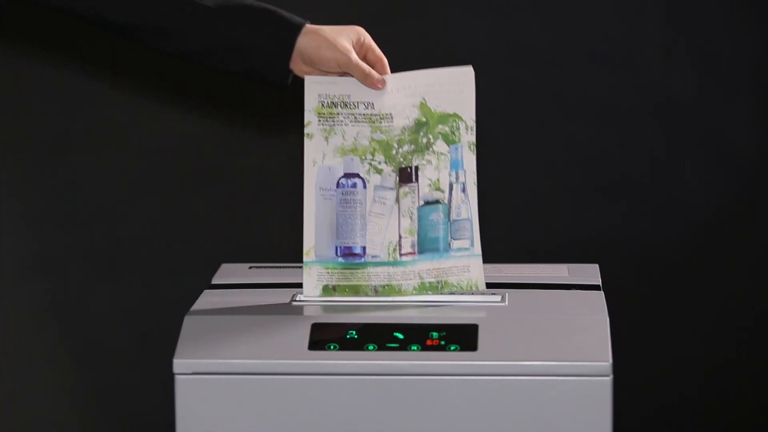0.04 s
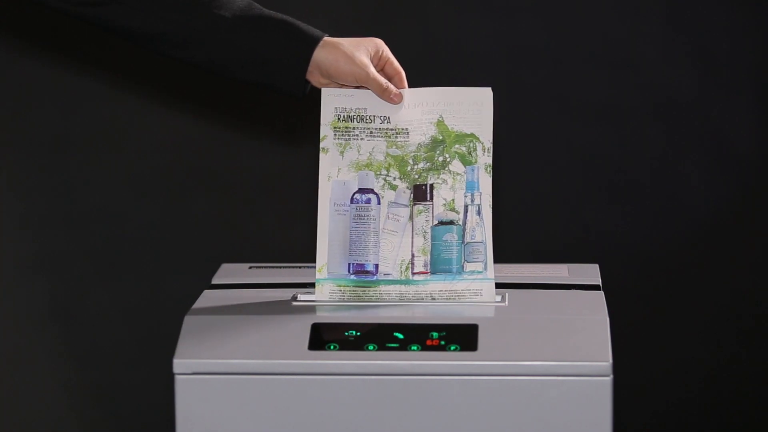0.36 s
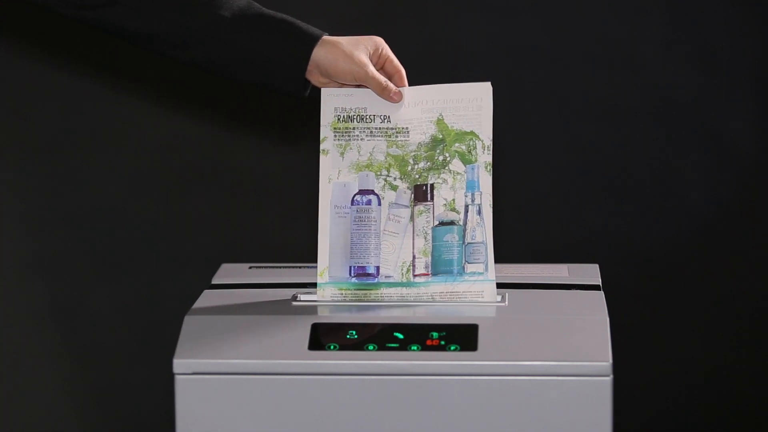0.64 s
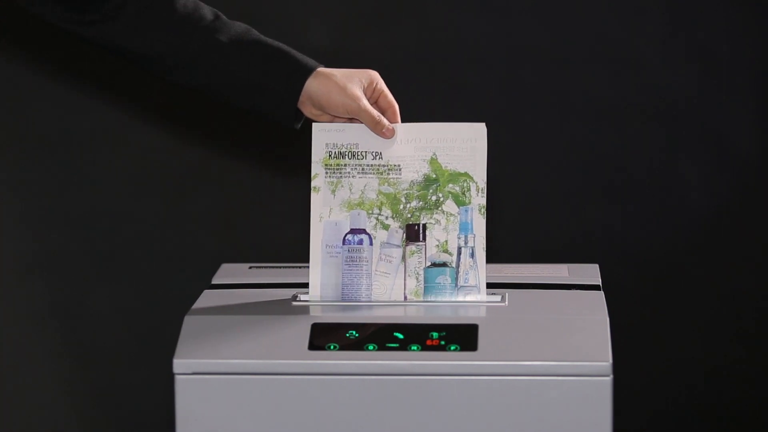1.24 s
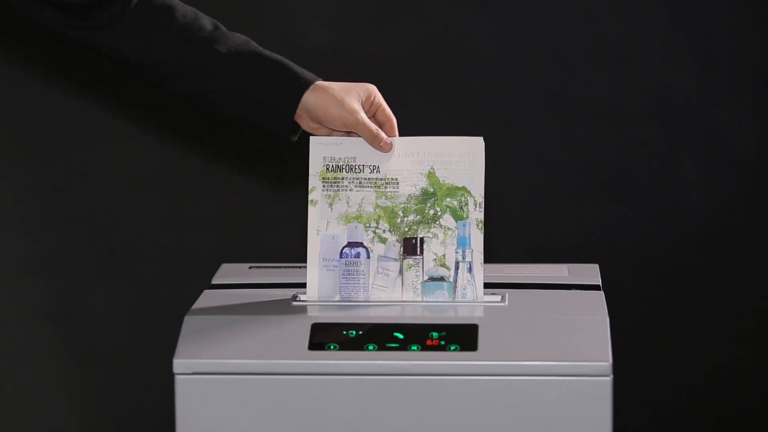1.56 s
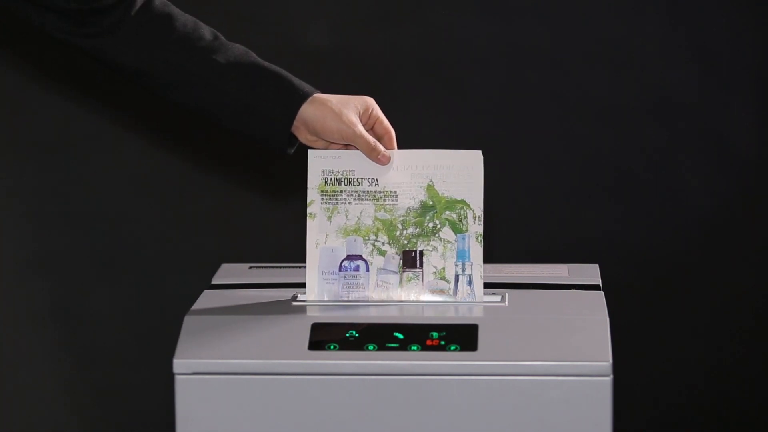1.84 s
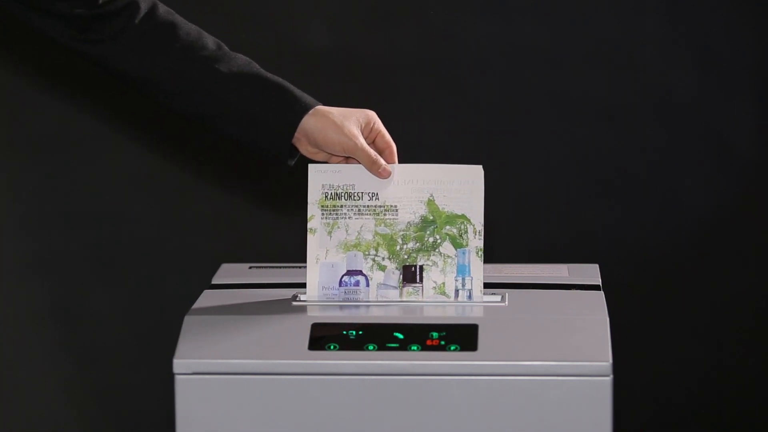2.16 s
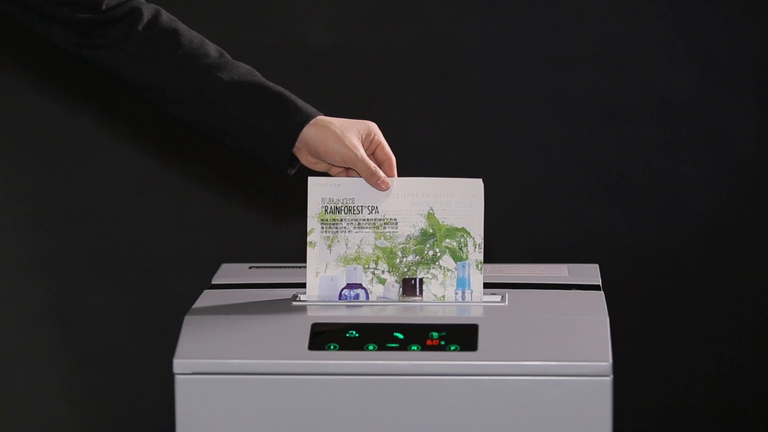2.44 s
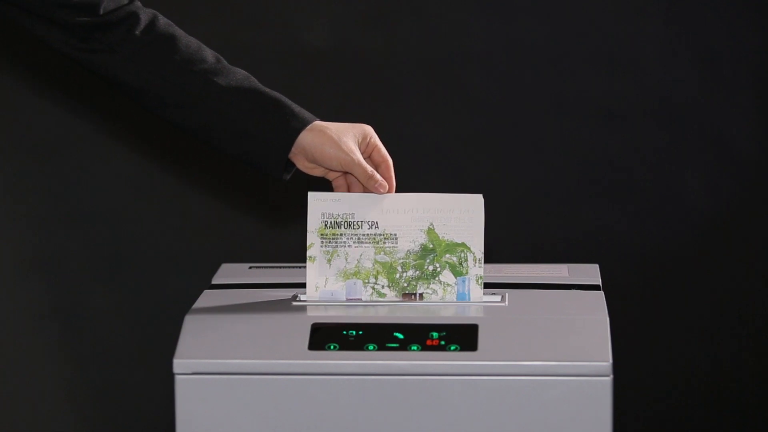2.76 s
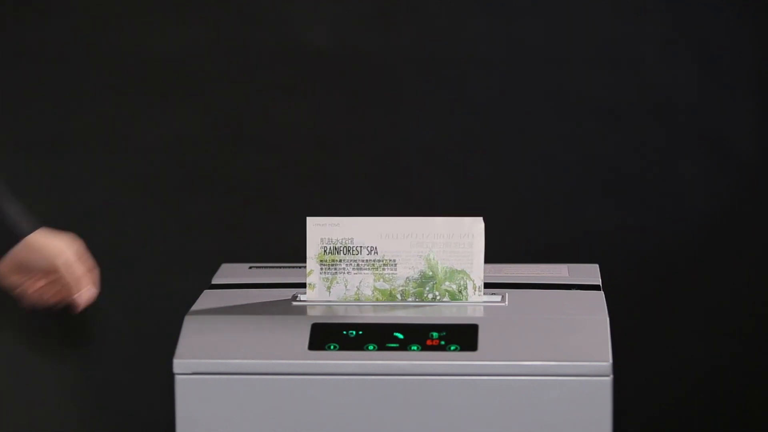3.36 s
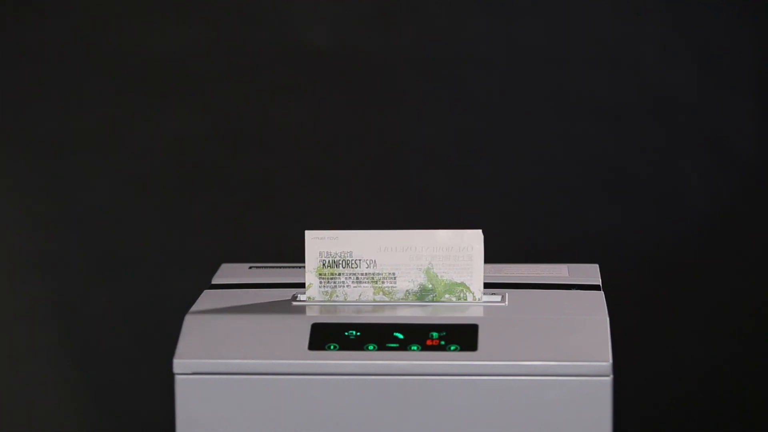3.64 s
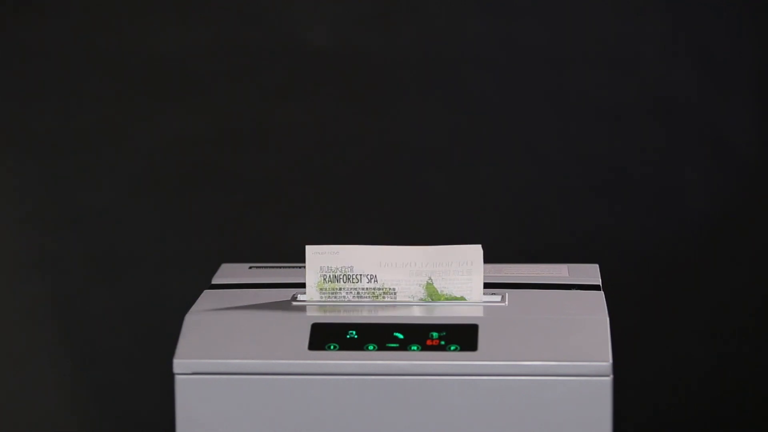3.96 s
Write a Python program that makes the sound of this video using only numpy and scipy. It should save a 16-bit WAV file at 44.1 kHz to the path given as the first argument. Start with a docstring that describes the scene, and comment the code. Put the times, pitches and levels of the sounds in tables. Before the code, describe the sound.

An office shredder grabs paper with a few sharp cracks and crunches. The cutting softens, then builds to a continuous sizzle, while the motor whines and the gears whir throughout in a dry indoor space.

```python
"""An office shredder cuts a few sheets of glossy paper, in a dry room.
The paper crunches and snaps as the cutters catch it; its breaking fibres then thicken to a steady
sizzle, with a short echo from cabinet and bin. The cutting loads the induction motor, which whines
and throbs once a turn over a whirring gear train."""
import sys
import numpy as np
from scipy import signal
from scipy.fft import rfft, irfft
from scipy.io import wavfile

SR = 44100
rng = np.random.default_rng(int(sys.argv[2]) if len(sys.argv) > 2 else 0)


def dump(signal):
    """Clip the signal to [-1, 1] and save it as 16-bit WAV at the path in sys.argv[1]."""
    limited = np.clip(np.atleast_2d(signal).T, -1, 1)
    pcm = np.round(limited * 32767).astype(np.int16)
    wavfile.write(sys.argv[1], SR, pcm)


N = 176400
T = np.arange(N) / SR
MAINS_HZ, WHINE_PER_TURN = 50, 30.13

# paper sizzle spectrum: f/Hz, relative density/dB
SIZZLE_SPECTRUM = [(1500, -20), (4000, -6), (5500, -4), (8200, 0), (11500, -2.5), (13500, -6.5),
                   (14700, -9.5), (15800, -15)]
# paper crunch spectrum: f/Hz, relative density/dB
CRUNCH_SPECTRUM = [(80, -25), (300, -5), (900, 1.5), (1600, 3.5), (3000, 0.5), (4400, -6), (5800, -16.5),
                   (9000, -15.5), (15000, -35)]


def amp(db):
    """Decibels to gain."""
    return 10 ** (np.asarray(db) / 20)


def unit(x):
    """Scales to rms 1."""
    return x / np.sqrt(np.mean(x ** 2) + 1e-20)


def curve(rows, column=1):
    """Table column interpolated over time."""
    rows = np.array(rows)
    return np.interp(T, rows[:, 0], rows[:, column])


def colour(x, spectrum):
    """Filters x by a spectrum; rms 1."""
    hz, db = np.transpose(spectrum)
    f_hz = np.fft.rfftfreq(N, 1 / SR)
    gain = amp(np.interp(np.log(f_hz + 1), np.log(hz), db))
    return unit(irfft(rfft(x) * gain, N))


def drift(rate_hz):
    """Slow random motion; rms 1."""
    f_hz = np.fft.rfftfreq(N, 1 / SR)
    lowpass = (f_hz > 0) / (1 + (f_hz / rate_hz) ** 4)
    return unit(irfft(rfft(rng.standard_normal(N)) * lowpass, N))


def by_load(load, free, full):
    """Blends from the free-running to the full-load value."""
    return free + (full - free) * load


def cabinet_rumble(level_db=-55, decay_s=.11):
    """Soft cabinet rumble, dying away at the start."""
    # f/Hz, relative density/dB
    spectrum = [(60, -10), (180, -4), (280, -7), (480, 3), (700, -8), (1500, -20), (5000, -45)]
    return amp(level_db) * np.exp(-T / decay_s) * colour(rng.standard_normal(N), spectrum)


def gear_mesh(turns, teeth_per_turn=4.871, backlash_cycles=.0076, waver=.15):
    """Tones of meshing teeth, loosened by backlash."""
    # harmonics of the tooth rate
    orders = [2, 3, 4, 8, 9, 10, 13]
    # per harmonic: level/dB
    levels_db = [-85.5, -80.5, -78, -67.5, -74.5, -74.5, -77.5]
    mesh_cycles = teeth_per_turn * turns + backlash_cycles * drift(4.2)
    out = np.zeros(N)
    for order, db in zip(orders, levels_db):
        gain = amp(db) * (1 + waver * drift(14))
        out += gain * np.cos(2 * np.pi * (order * mesh_cycles + rng.random()))
    return np.sqrt(2) * out


def gear_whir(turns, load, rub_db=-56, throb_depth=.0415, load_rise_db=7.5):
    """Gears and bearings rub, pulsing with the shaft and ringing the housing."""
    # f/Hz, relative density/dB
    rub_spectrum = [(20, -5), (72, -1), (150, -11.5), (260, -10), (450, -7), (570, -3.5), (690, 3.5),
                    (780, 0.5), (890, -5.5), (1130, -3), (1550, -1), (1950, -5), (2500, -4), (3400, -6),
                    (4100, -13), (5300, -16.5), (8200, -13.5), (12000, -21.5), (14000, -19), (15800, -29)]
    # f/Hz, bandwidth/Hz, level at half load/dB
    housing_modes = [(583.5, 12, -74), (674, 34, -71.5), (1197, 45, -72.5), (1335, 44, -82),
                     (1585, 50, -71.5), (1730, 69, -80.5), (2230, 110, -70), (2500, 44, -71.5),
                     (2640, 50, -76.5), (3097, 32, -67.5), (3228, 31, -71.5), (3530, 43, -73.5),
                     (4350, 44, -76), (6220, 130, -77), (8380, 150, -78.5), (11340, 200, -80)]
    throb = 1 + throb_depth * np.cos(2 * np.pi * turns)
    out = amp(rub_db) * colour(throb * rng.standard_normal(N), rub_spectrum)
    for hz, width_hz, db in housing_modes:
        b, a = signal.iirpeak(hz, hz / width_hz, SR)
        ring = unit(signal.lfilter(b, a, throb * rng.standard_normal(N)))
        out += amp(db + load_rise_db * (load - .5)) * ring
    return out


def motor_side_tones(turns, load, waver=.28):
    """Unsteady sidebands and octave of the whine, plus mains hum."""
    # f as a sum of multiples of: whine, shaft rate, mains
    multiples = [(1, 2, 0), (1, -2, 0), (1, -3, 0), (1, 0, -4), (1, 0, 12), (2, 0, 0), (0, 0, 4), (0, 0, 6),
                 (0, 0, 12)]
    # per tone: free level/dB, full-load level/dB
    levels_db = [(-77, -72), (-69.5, -74), (-73, -75.5), (-76.5, -72), (-83, -67.5), (-76, -77),
                 (-78, -78.5), (-81, -82), (-78, -93)]
    out = np.zeros(N)
    for (whine, shaft, mains), (free_db, full_db) in zip(multiples, levels_db):
        cycles = (whine * WHINE_PER_TURN + shaft) * turns + mains * MAINS_HZ * T + rng.random()
        shake = 1 + waver * (drift(11) + 1j * drift(8.6)) / np.sqrt(2)
        out += amp(by_load(load, free_db, full_db)) * (shake * np.exp(2j * np.pi * cycles)).real
    return np.sqrt(2) * out


def motor_whine(turns, load, turn_swing_rad=.17, waver=.027):
    """Main motor tone: throbs once a turn, buzzes magnetically at twice the mains rate."""
    level_db = by_load(load, -56, -54.5)
    throb_depth = by_load(load, .52, .19)
    buzz_depth = by_load(load, .19, .3)
    buzz_swing_rad = by_load(load, .7, .45)
    shaft_rad = 2 * np.pi * turns
    buzz = np.cos(2 * np.pi * (2 * MAINS_HZ * T + rng.random()))
    phase_rad = WHINE_PER_TURN * shaft_rad - turn_swing_rad * np.sin(shaft_rad) + buzz_swing_rad * buzz
    envelope = 1 + throb_depth * np.cos(shaft_rad) + buzz_depth * buzz + waver * drift(3.3)
    return np.sqrt(2) * amp(level_db) * envelope * np.cos(phase_rad)


def bin_echo(x, t60_s=.13, wet_db=-8, gap_s=.002):
    """Adds the short echo of cabinet and bin."""
    t = T[:SR // 3]
    tail = rng.standard_normal(len(t)) * amp(-60 * t / t60_s) * (t > gap_s)
    wet = signal.fftconvolve(x, tail / np.linalg.norm(tail))[:N]
    return (x + amp(wet_db) * wet) / np.sqrt(1 + amp(wet_db) ** 2)


def fibres(rate_per_s=9000, spread_db=2.5):
    """Dense clicks of breaking fibres, a few much larger than the rest; rms 1."""
    size = amp(spread_db * np.minimum(rng.exponential(1, N), 4.5))
    polarity = rng.choice([-1., 1.], N)
    breaks = rng.random(N) < rate_per_s / SR
    return unit(size * polarity * breaks)


def paper_snaps(decay_s=.001):
    """Sharp cracks as the paper's edge buckles."""
    # t/s, peak/dB
    snaps = [(.1935, -41), (.2102, -36), (.217, -37.5), (.233, -37.5), (.3565, -37), (1.324, -43)]
    out = np.zeros(N)
    for start_s, peak_db in snaps:
        envelope = (T >= start_s) * np.exp(-abs(T - start_s) / decay_s)
        crack = colour(rng.standard_normal(N) * envelope, CRUNCH_SPECTRUM)
        out += amp(peak_db) * crack / abs(crack).max()
    return out


def cutter_bites(attack_s=.0034, decay_s=.031):
    """Bursts of crunch, sizzle and scrape as the cutters grab the paper."""
    # t/s, hold/s, crunch/dB, sizzle/dB, scrape/dB
    bites = [(0.182, .02, -51, -76, -77), (0.206, 0.028, -44.5, -63, -52.5),
             (0.238, 0.047, -47.5, -53.5, -59), (0.296, 0.032, -49.5, -61, -66),
             (0.339, 0.018, -45, -65, -65), (0.38, 0.021, -51, -66, -68), (1.305, 0.061, -52, -69, -78),
             (3.388, 0.031, -57, -72, -72)]
    # cutters on the glossy surface: f/Hz, relative density/dB
    scrape_spectrum = [(3000, -16), (5000, -4.5), (6500, -1.5), (8200, -2.5), (9500, -12), (15000, -33)]
    spectra = (CRUNCH_SPECTRUM, SIZZLE_SPECTRUM, scrape_spectrum)
    powers = np.zeros((3, N))
    for start_s, hold_s, *levels_db in bites:
        rise = np.clip((T - start_s) / attack_s, 0, 1)
        fall = np.exp(-np.maximum(T - start_s - hold_s, 0) / decay_s)
        powers += np.outer(amp(levels_db), rise * fall) ** 2
    return sum(np.sqrt(power) * colour(fibres(), spectrum) for power, spectrum in zip(powers, spectra))


def paper_cutting():
    """Continuous tearing and sizzling of paper between the cutters."""
    # t/s, tear/dB, sizzle/dB
    levels = [(0, -56, -62), (.15, -63.5, -68), (.45, -59, -75), (.68, -63.5, -70), (.74, -53.5, -63),
              (.9, -60.5, -64), (1.08, -69, -71), (1.62, -64.5, -70), (1.73, -55.5, -63),
              (2.18, -59, -63.5), (2.28, -57.5, -59), (2.65, -58, -57.5), (2.95, -54.5, -55.5),
              (3.2, -56, -55.5), (3.42, -54.5, -58), (3.6, -55.5, -58), (4, -56, -58.5)]
    # f/Hz, relative density/dB
    tear_spectrum = [(100, -17.5), (400, -1.5), (1200, -1.5), (1900, -1.5), (2600, .5), (4200, -1.5),
                     (5300, -10.5), (9000, -18), (13000, -26), (15500, -36)]
    tear = amp(curve(levels, column=1)) * colour(fibres(), tear_spectrum)
    sizzle = amp(curve(levels, column=2)) * colour(fibres(), SIZZLE_SPECTRUM)
    return tear + sizzle


def scene(free_hz=24.61, sag_hz=.085, wander_hz=.014, first_throb_s=.008):
    """Drive and paper, alike in both channels; the shaft slows slightly under load."""
    # t/s, load/(0..1)
    motor_load = [(0, 0.14), (1.6, 0.03), (2.2, .55), (2.45, .95), (4, 1)]
    load = curve(motor_load)
    shaft_hz = free_hz - sag_hz * load + wander_hz * drift(3.44)
    turns = np.cumsum(shaft_hz) / SR - first_throb_s * free_hz
    motor = motor_whine(turns, load) + motor_side_tones(turns, load)
    machine = motor + gear_mesh(turns) + gear_whir(turns, load) + cabinet_rumble()
    sound = machine + bin_echo(paper_cutting() + cutter_bites() + paper_snaps())
    return np.array([sound, sound])


def record(dry, cutoff_hz=15750, dc_offset=-.0048):
    """Recorder band limit and DC offset."""
    lowpass = signal.firwin(511, cutoff_hz, window=("kaiser", 9), fs=SR)
    return dc_offset + signal.oaconvolve(dry, lowpass[None], "same")


dry = scene()
out = record(dry)
dump(out)
```